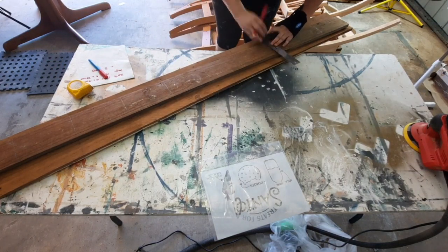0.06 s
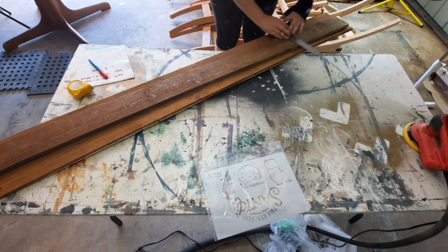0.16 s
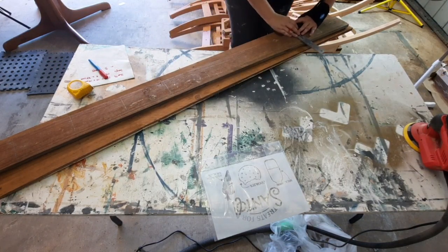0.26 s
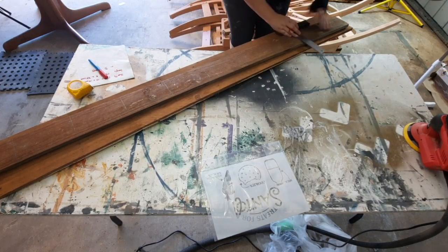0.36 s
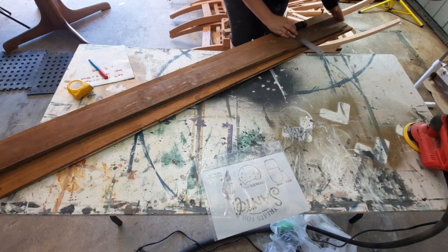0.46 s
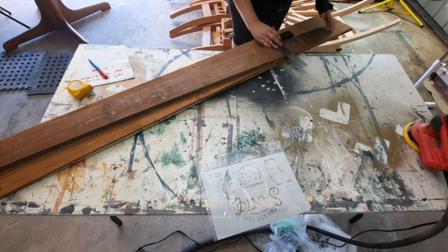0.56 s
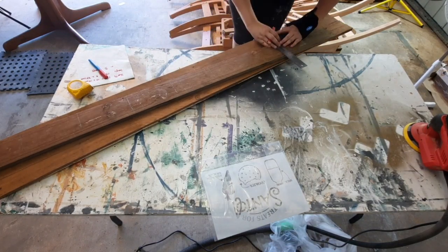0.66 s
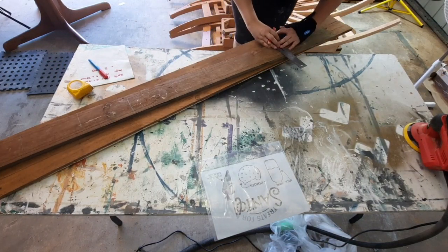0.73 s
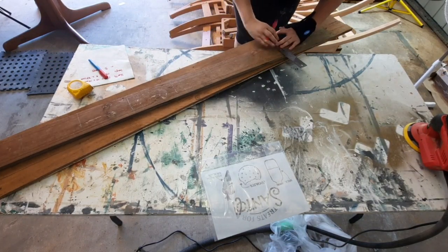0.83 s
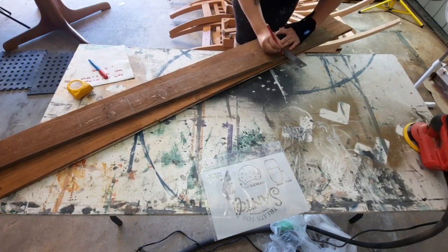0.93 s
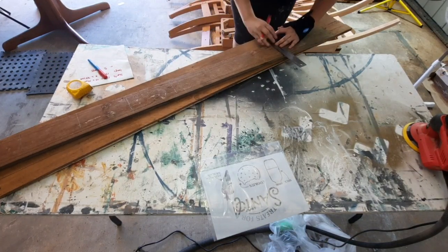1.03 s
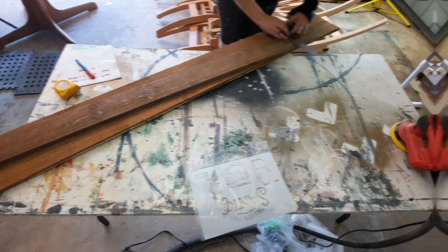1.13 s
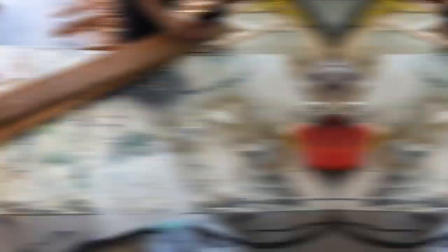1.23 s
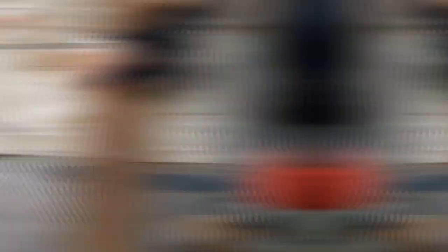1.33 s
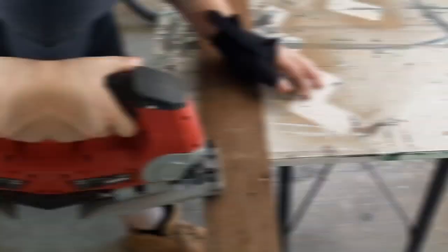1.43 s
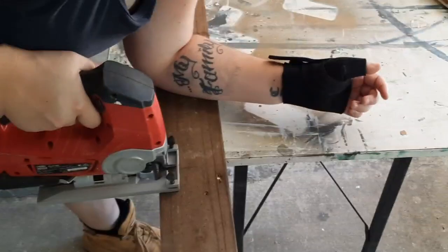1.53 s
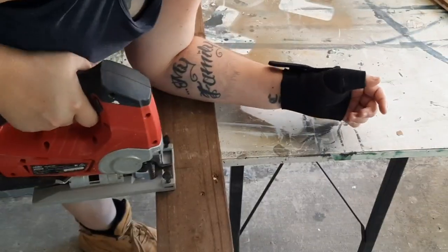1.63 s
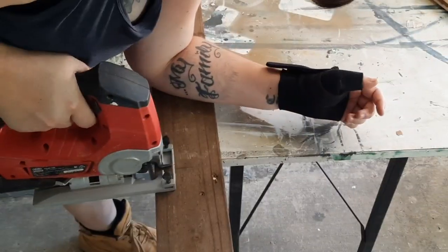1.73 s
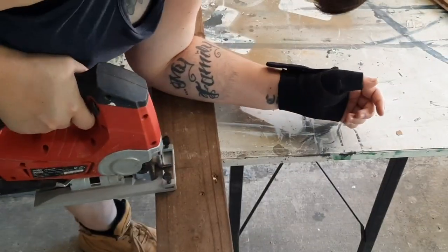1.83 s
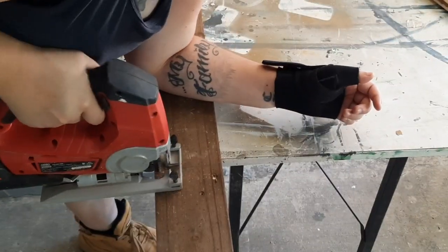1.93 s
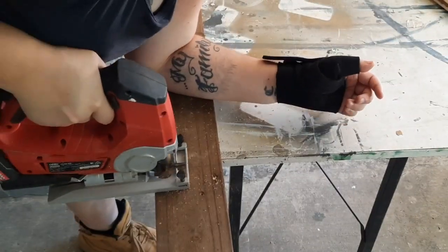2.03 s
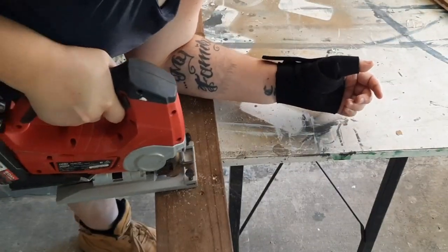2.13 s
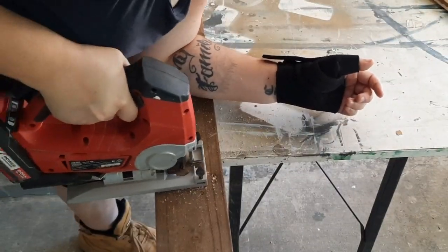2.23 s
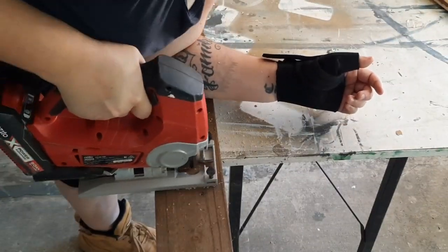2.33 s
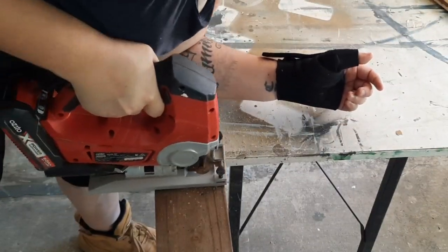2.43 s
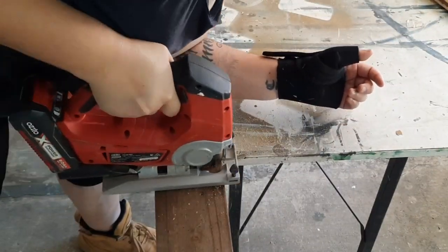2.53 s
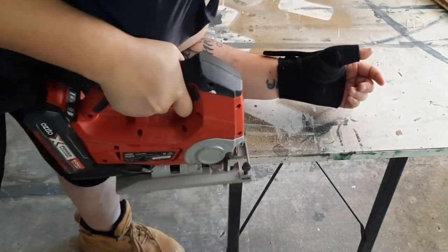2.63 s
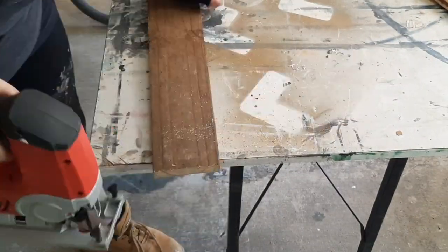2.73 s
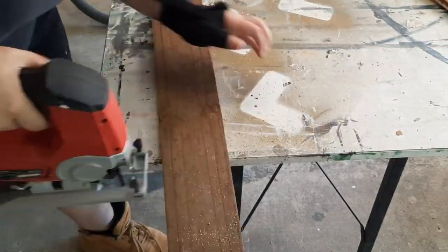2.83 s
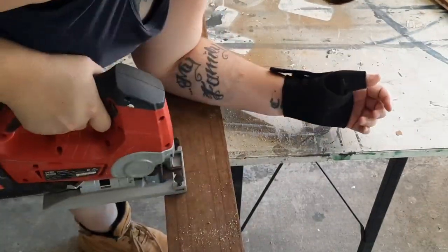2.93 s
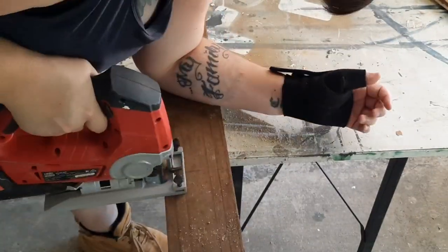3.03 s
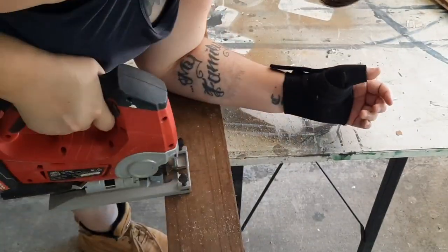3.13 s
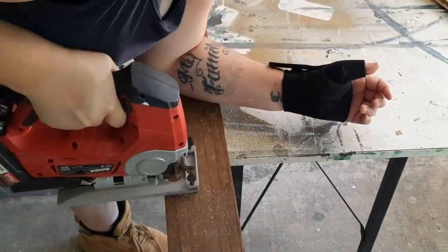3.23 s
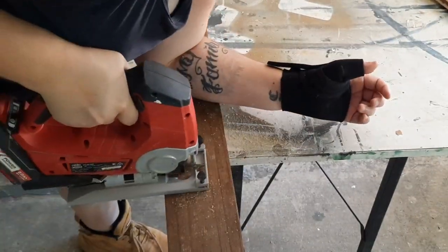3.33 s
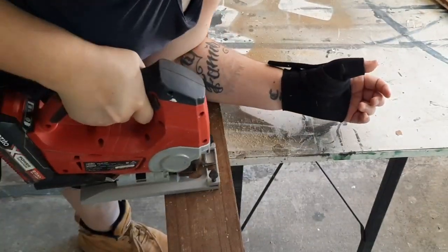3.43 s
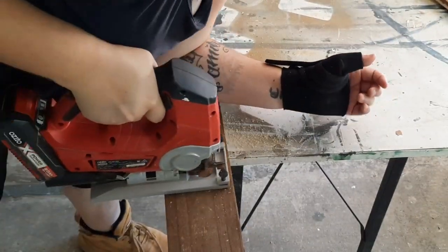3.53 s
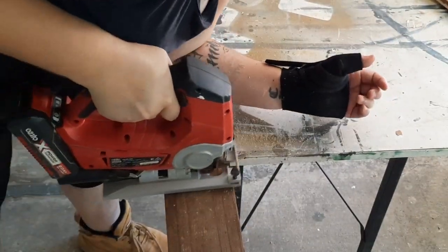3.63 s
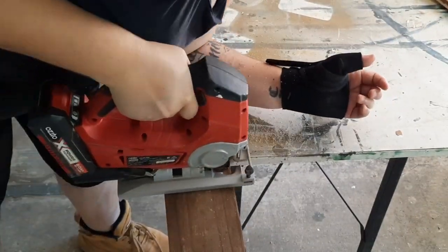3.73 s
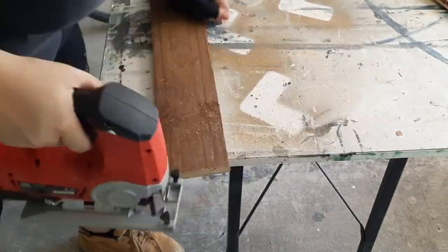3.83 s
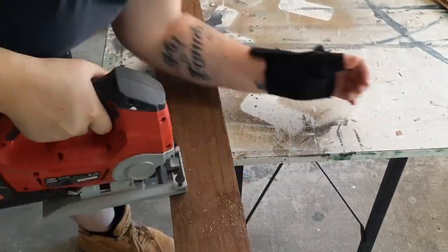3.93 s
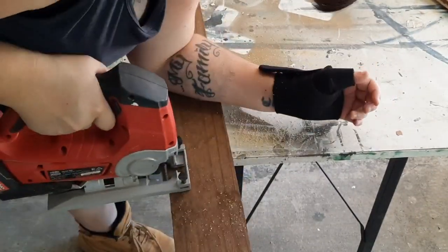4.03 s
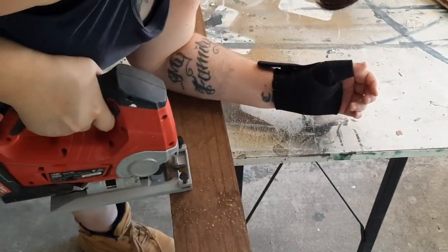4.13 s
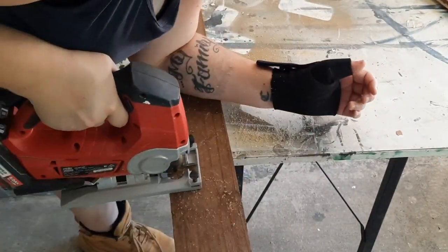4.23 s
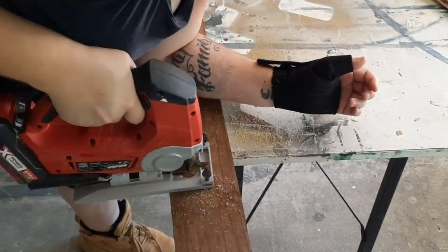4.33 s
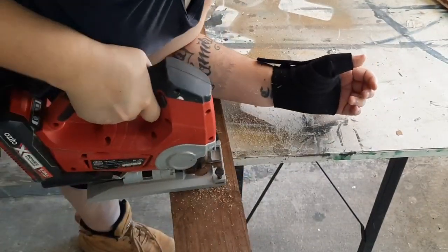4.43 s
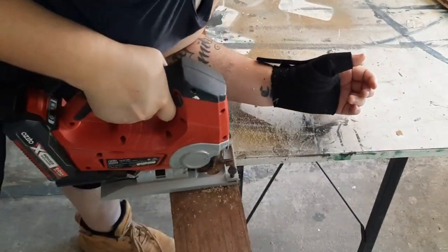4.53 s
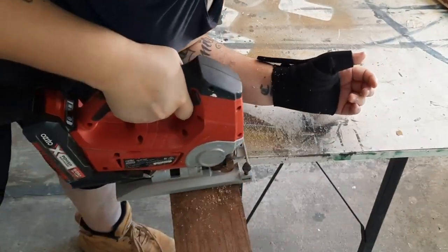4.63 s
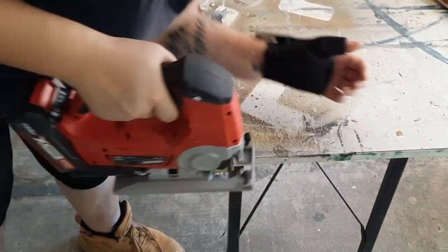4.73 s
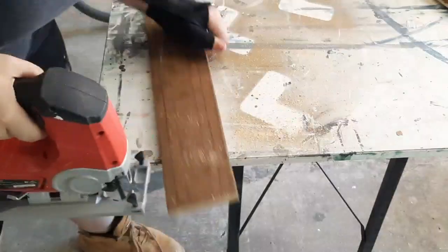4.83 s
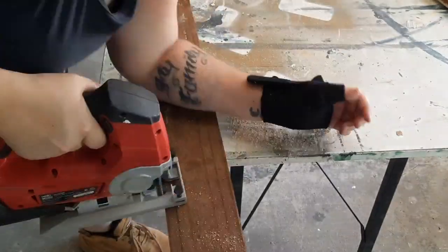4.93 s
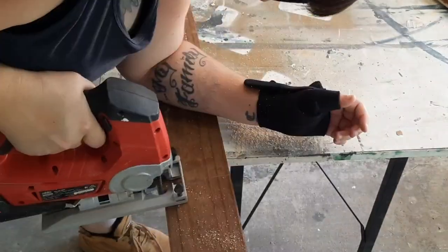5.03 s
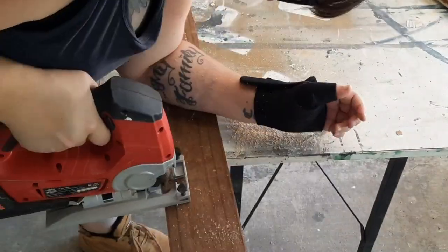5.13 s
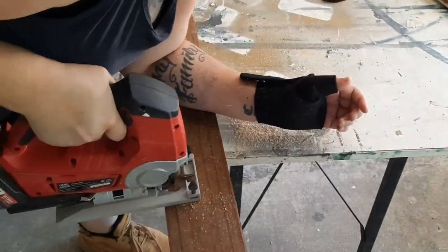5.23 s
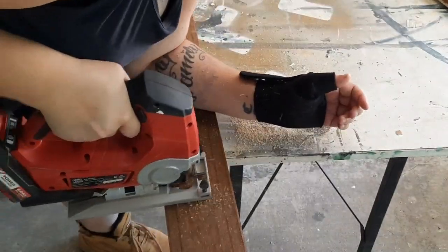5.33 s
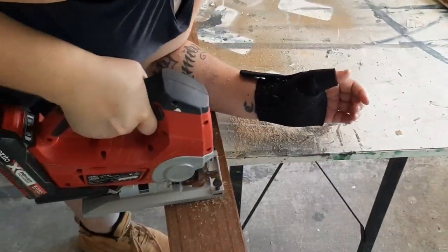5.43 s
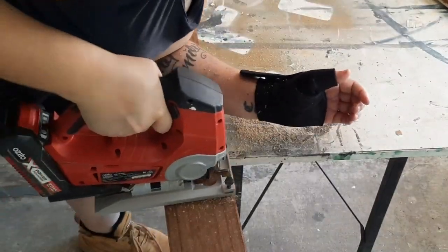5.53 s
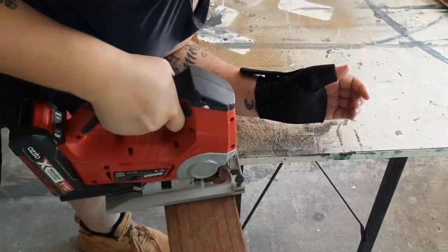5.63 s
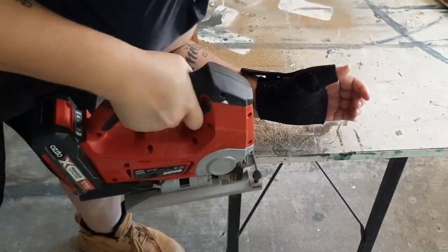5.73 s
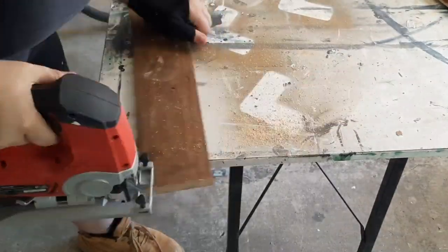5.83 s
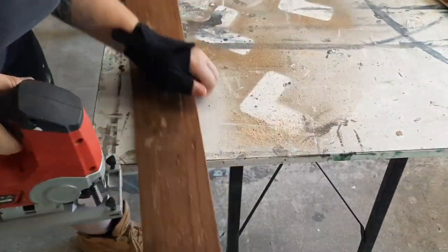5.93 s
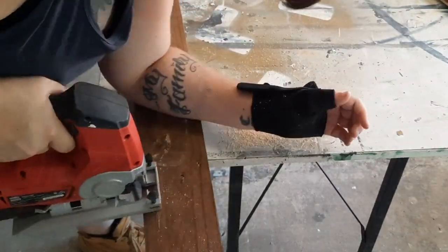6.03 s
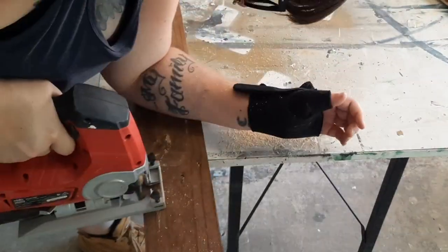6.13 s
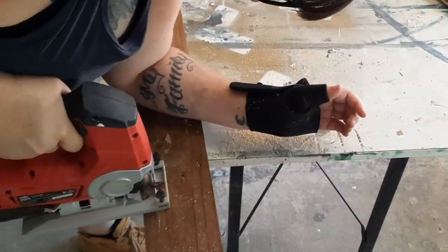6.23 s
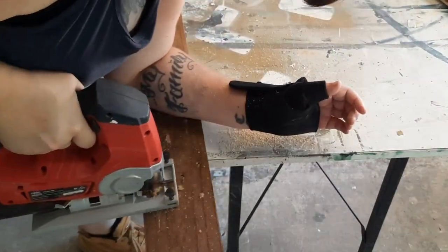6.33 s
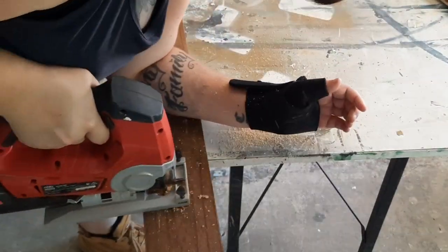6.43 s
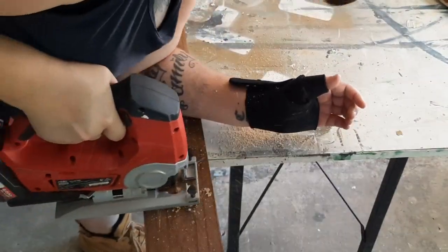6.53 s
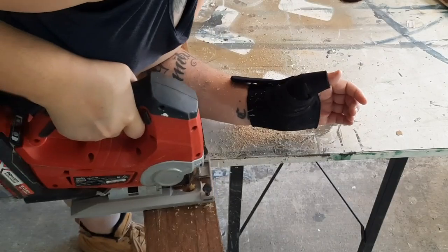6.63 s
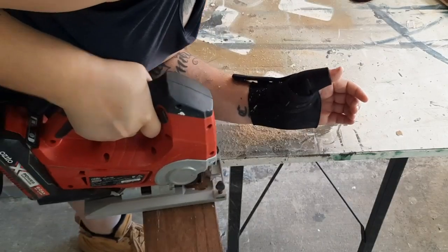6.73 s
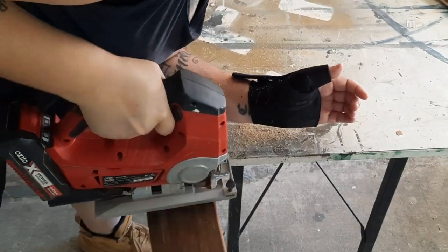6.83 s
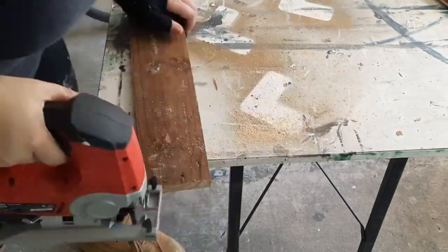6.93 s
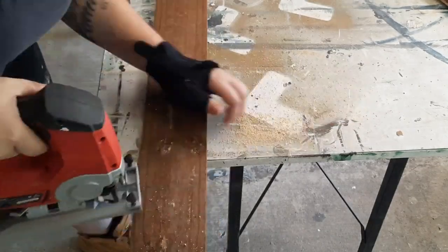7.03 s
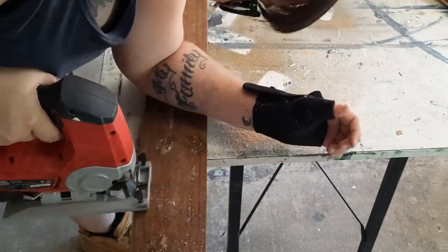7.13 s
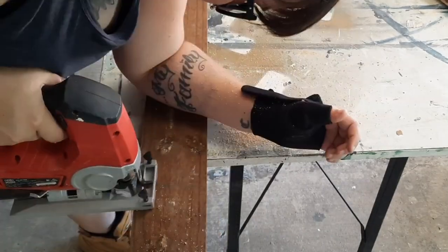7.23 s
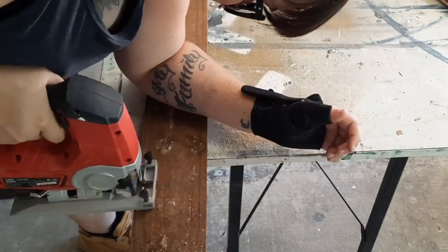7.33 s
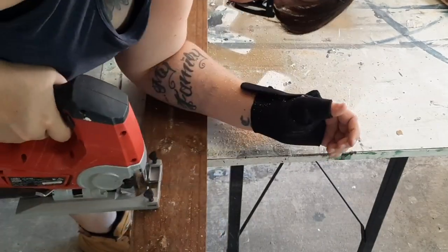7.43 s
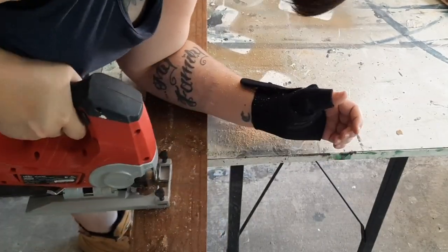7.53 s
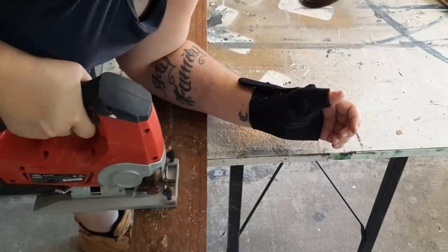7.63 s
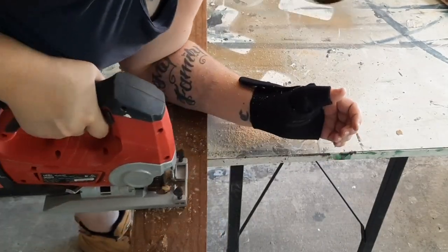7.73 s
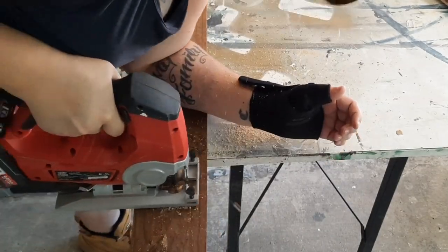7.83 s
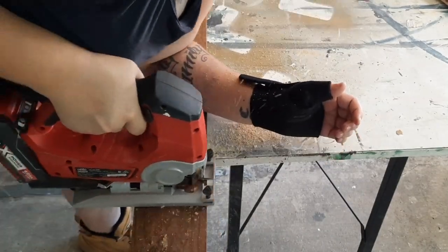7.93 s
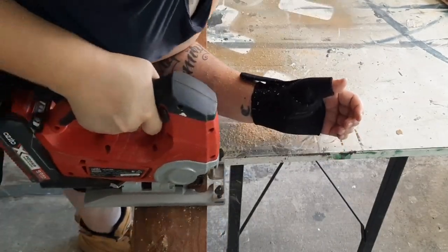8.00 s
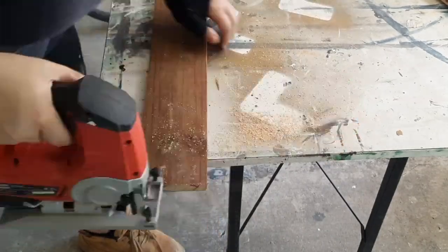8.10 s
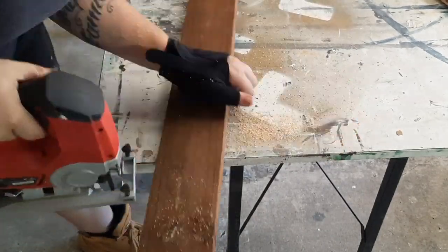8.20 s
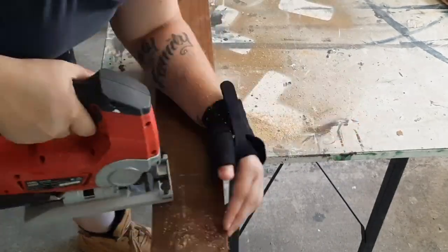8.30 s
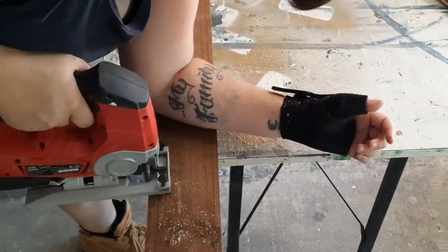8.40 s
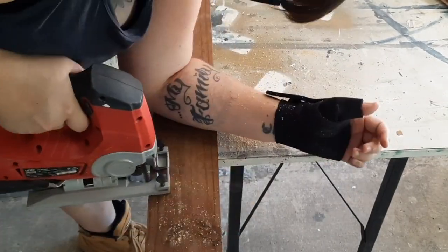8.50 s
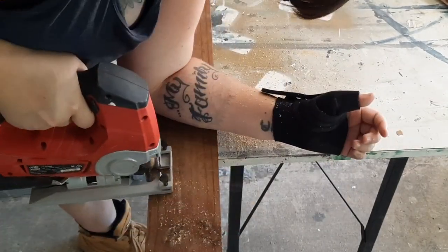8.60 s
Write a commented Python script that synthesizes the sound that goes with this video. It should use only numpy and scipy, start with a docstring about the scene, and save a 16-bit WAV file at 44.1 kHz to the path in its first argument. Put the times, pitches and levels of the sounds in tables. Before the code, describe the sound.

After a board scuffs on a workbench, a jigsaw saws timber in short stop-start bursts, with squeaks and a few clacks.

```python
"""A board is shuffled about on a workshop bench while far birds chirp; then a cordless jigsaw
crosscuts it in seven short spells. The teeth's impacts excite the resonances of saw, board and bench,
so each cut rasps and thrums under the drive's whine; where the hand leans on the saw, the sound grows
and the pitch sags. Friction makes the blade squeak as it binds and squeal as it leaves the kerf.
Between cuts the board is knocked along over a low hum."""
import sys
import numpy as np
from scipy import signal
from scipy.fft import rfft, irfft, next_fast_len
from scipy.io import wavfile
from scipy.ndimage import uniform_filter1d, map_coordinates

SR = 44100
rng = np.random.default_rng(int(sys.argv[2]) if len(sys.argv) > 2 else 0)


def digitize_waveform(pressure):
    """Quantize a signal to 16-bit integers and store it at the path in sys.argv[1].

    Rows of a 2-D input are taken as channels; values are limited to [-1, 1].
    """
    field = np.atleast_2d(pressure).T
    bounded = np.clip(field, -1, 1)
    quanta = np.round(bounded * 32767).astype(np.int16)
    wavfile.write(sys.argv[1], SR, quanta)


N = 381906

# Spells with the trigger held: (start [s], end [s], run-up time constant [s], hiss level [dB],
# chatter level [dB], thrum level [dB], hum level in the pause before [dB])
CUTS = [(1.807, 2.654, .22, -44, -45, -48, -57), (2.994, 3.778, 0.057, -44, -44.5, -47, -57.5),
        (4.082, 4.729, 0.088, -44, -45, -47, -60.5), (5.058, 5.744, 0.061, -44.5, -45.5, -45.5, -56),
        (6.107, 6.873, .15, -44.5, -45, -46.5, -58), (7.331, 8.064, 0.032, -43.5, -43.5, -49.5, -63.5),
        (8.522, 8.678, 0.14, -46, -46.5, -49, -57)]


def jigsaw():
    """Forced vibration: the teeth shake bench and board; load raises the level and slows the drive."""
    whine_hz, sag_hz_per_db, run_up_hz, flutter_hz = 1900, 21, 250, 43.3
    load_db, run_up, entry, breakthrough, (hiss_db, chatter_db, thrum_db) = effort()
    ease_db = 6.5 * breakthrough
    chatter_db = chatter_db + load_db - 0.72 * ease_db
    thrum_db = thrum_db + 0.061 * load_db - 6.5 * entry - ease_db
    drive_db = -40.5 + 0.18 * load_db - 3.5 * entry - ease_db
    hiss_db = hiss_db + 0.14 * load_db - 0.46 * ease_db
    pitch = whine_hz - sag_hz_per_db * load_db - run_up_hz * run_up
    trigger = sum(gate(start - .004, end - start + .012, rise=.012, fall=.008) for start, end, *_ in CUTS)
    # the hiss fades a little earlier, as the teeth break through
    biting = sum(gate(start - .008, end - start + .006, rise=.016, fall=.01) for start, end, *_ in CUTS)
    # the rasp flutters about 43 times a second
    flutter = 2 * np.pi * np.cumsum(flutter_hz + 0.15 * wobble(4.2)) / SR
    shake = amp(1.3 * np.cos(flutter) + 0.35 * np.cos(2 * flutter) + 0.25 * wobble(130))
    thrum = spread(bites(500, scatter_db=6, smear=0.75), body(65, 248))
    chatter = spread(bites(1200, scatter_db=0, smear=1), body(184, 1287))
    gears = spread(bites(1800, scatter_db=3, smear=0.61), body(1460, 2690))
    hiss = spread(bites(5000, scatter_db=4, smear=1.07), body(3340, 21000))
    rough_tones = [tone(pitch + 52 * wobble(150) + 40 * wobble(25)) * (1 + 0.4 * wobble(120))
                   for _ in range(2)]
    whine = spread(np.array(rough_tones), np.ones_like)
    drive = amp(-1.8) * gears + amp(-5.5 - 6 * entry) * whine
    cut = amp(chatter_db) * chatter + amp(thrum_db) * thrum + amp(drive_db) * drive
    cut = trigger * grain(cut, patchy_db=1.5)
    hiss = biting * amp(hiss_db + 0.44 * wobble(180)) * grain(hiss, patchy_db=2.1)
    return shake * (cut + hiss)


def effort():
    """Mechanical load: pushes add up; run-up and entry decay from 1, breakthrough grows to 1."""
    # The hand leans on the saw: (time of peak [s], half length [s], load [dB])
    pushes = [(1.893, .055, 6.5), (2.139, .035, 5.5), (2.451, .075, 6.5), (3.043, .09, 3.5),
              (3.317, .04, 4), (3.628, 0.06, 7.5), (4.114, .05, 3), (4.301, .1, 3.5), (4.577, .06, 5.5),
              (5.125, .065, 4.5), (5.319, .05, 6), (5.582, 0.075, 9.5), (6.238, .15, 2.5), (6.7, .075, 8),
              (7.463, .085, 6), (7.928, .014, 8.5), (8.65, .06, 6.5)]
    entry_s, breakthrough_s = 0.11, 0.047
    t = clock()
    load_db = sum(db * np.exp(-np.minimum(((t - s) / half) ** 2, 20)) for s, half, db in pushes)
    run_up, entry, breakthrough = np.zeros((3, N))
    levels = np.zeros((3, N))
    for start, end, run_up_s, *cut_db, _ in CUTS:
        now = t > start - .1
        age, remaining = np.maximum(t[now] - start, 0), np.maximum(end - t[now], 0)
        run_up[now] = np.exp(-age / run_up_s)
        entry[now] = np.exp(-age / entry_s)
        finishes = start < CUTS[-1][0]  # the last cut stops short of the far edge
        breakthrough[now] = np.exp(-remaining / breakthrough_s) * finishes
        levels[:, now] = np.array(cut_db)[:, None]
    return load_db, run_up, entry, breakthrough, levels


def bites(rate, scatter_db, smear):
    """Shot noise: fibres tear in uneven clicks, rate a second, over a bed of steady noise."""
    clicks = (rng.random(N) < rate / SR) * amp(scatter_db * rng.standard_normal(N))
    return unit(clicks * noise()) + smear * noise()


def body(lo_hz, hi_hz):
    """Resonance: the frequency response through which the bites are heard, within one band."""
    # Broad spectrum of the rasp: (frequency [Hz], spectral density [dB])
    rasp = [(35, -37.5), (60, -26.5), (129, -7), (242, -11.5), (305, 0), (343, -6.5), (403, -2),
            (559, -7.5), (673, -5), (1290, -3.5), (1790, 0), (3190, -10), (7540, -20.5), (9300, -21.5),
            (15500, -25)]
    # Resonances and dips of saw, board and bench: (frequency [Hz], width [Hz], gain [dB])
    resonances = [(135, 11, 4.5), (244, 67, -10), (316, 39, 4.5), (399.5, 35, 5), (510, 30, 6.5),
                  (610, 39, 0.5), (688, 53, 6), (810, 14, -2), (972, 35, 4.5), (1458, 79, 5), (1976, 32, 4),
                  (2640, 900, 6), (7630, 2900, 2.5), (9570, 1670, -4), (12150, 1500, 2.5),
                  (15000, 900, -0.5)]
    # Resonances of the gear housing: (frequency [Hz], width [Hz], gain [dB])
    housing = [(1622, 40, 4), (1775, 55, 3.5)]

    def response(hz):
        peaks_db = sum(db / (1 + (2 * (hz - centre) / width) ** 2)
                       for centre, width, db in resonances + housing)
        return amp(along(rasp, hz) + peaks_db) * band(hz, lo_hz, hi_hz)
    return response


def grain(x, patchy_db):
    """Spectral modulation: uneven wood makes narrow bands swell and sink for tens of milliseconds."""
    spectra = signal.stft(x, nperseg=1024)[2]
    patches = rng.standard_normal(spectra.shape[1:])
    for axis in (0, 1):
        patches = uniform_filter1d(patches, size=3, axis=axis)
    return signal.istft(spectra * amp(patchy_db * unit(patches)), nperseg=1024)[1][:, :N]


def squeals():
    """Friction excites the blade: it squeaks where it binds, and scrapes and sings leaving the kerf."""
    # Modes of blade and shoe: (frequency [Hz], width [Hz], level [dB])
    modes = [(1200, 160, -4), (1470, 200, 0), (2020, 200, -7), (2480, 220, 0), (3420, 250, -5),
             (5100, 500, -16), (6000, 500, -17), (6900, 600, -19)]
    # The blade binds: (time [s], frequency [Hz], level [dB])
    squeaks = [(1.87, 622, -42), (1.935, 1466, -40), (4.076, 837, -46), (5.075, 972, -37.5),
               (5.176, 1480, -41), (6.643, 1137, -43)]
    # The blade leaves the kerf: (time [s], length [s], level [dB], singing frequency [Hz])
    scrapes = [(2.635, 0.036, -38, 2473), (2.685, 0.037, -50, 2540), (2.716, .024, -51.5, 1440),
               (3.782, 0.027, -40, 3350), (3.824, 0.026, -50, 1222), (4.734, 0.028, -42, 2360),
               (4.76, 0.043, -47, 2340), (5.75, 0.038, -47, 2500), (6.874, .017, -43.5, 1526),
               (6.89, 0.028, -44, 2420), (8.06, 0.025, -40.5, 1380)]

    def steel(hz):
        return sum((-1) ** k * amp(db) * 1j * hz * width / (centre ** 2 - hz ** 2 + 1j * hz * width)
                   for k, (centre, width, db) in enumerate(modes))
    waver = 1 + 0.01005 * wobble(200)
    touch = lambda start, length: gate(start, length, rise=0.006, fall=0.0063)
    song = sum(amp(db) * touch(start, length=0.026) * tone(hz * waver) for start, hz, db in squeaks)
    rub = np.zeros(N)
    for start, length, db, hz in scrapes:
        contact = amp(db) * touch(start, length)
        rub += contact
        song += amp(0.5) * contact * tone(hz * waver)
    ring = unit(sum(amp(db + 6 * wobble(70)) * tone(hz * (1 + .008 * wobble(200))) for hz, _, db in modes))
    scrape = spread(bites(2000, scatter_db=5.5, smear=0.88), steel)
    kerf = spread(bites(1200, scatter_db=5, smear=0.32), body(250, 1640))  # the wood's own dull rasp
    return rub * (amp(-3.3) * scrape + amp(-4.5) * ring + amp(-11) * kerf) + song * amp(3.3 * wobble(220))


def clacks():
    """Free vibration: a hard contact gives a dull crack and leaves the wood's damped modes ringing."""
    # Hard contacts on the wood, among them the cut-off piece clacking down near 8.1 s: (time [s], level [dB])
    impacts = [(3.604, -21.5), (5.777, -32), (6.693, -28), (6.72, -17.5), (7.928, -24), (8.067, -20.5),
               (8.078, -21.5), (8.112, -18.5), (8.117, -21.5)]
    # Modes of the wood: (frequency [Hz], level [dB], time to decay by 60 dB [s])
    modes = [(626, -36, 0.097), (786, -20.5, 0.038), (1190, -2.5, 0.02), (1650, 0.5, 0.014),
             (2440, -2, 0.018), (2650, -11, 0.039), (3400, -8, 0.018)]
    out, t = np.zeros((2, N + SR)), np.arange(SR // 5) / SR
    attack = 1 - np.exp(-t / 0.00017)
    for start, db in impacts:
        ring = sum(amp(level + rng.normal(0, 1.9, (2, 1)) - 60 * t / t60)
                   * np.sin(2 * np.pi * hz * t + rng.uniform(0, 2 * np.pi)) for hz, level, t60 in modes)
        crack = 0.38 * amp(-60 * t / 0.0081) * rng.standard_normal((2, len(t)))
        first = round(start * SR)
        out[:, first:first + len(t)] += amp(db - 4) * (ring + crack) * attack
    return filtered(out[:, :N], lambda hz: 1 / (1 + (hz / 4200) ** 3))


def board():
    """Friction and impact: the board scuffs as it slides; set down, it rings and thumps the bench."""
    # The board slides: (time [s], length [s], level [dB])
    slides = [(-0.002, 0.05, -43.5), (0.085, 0.035, -50.5), (0.133, 0.057, -47), (.458, .092, -42),
              (0.96, 0.053, -47), (1.114, 0.069, -52.5), (5.909, 0.06, -63), (7.004, 0.043, -61.5),
              (8.209, 0.054, -66)]
    # The board is set down; its ring depends on where it is held:
    # (time [s], length [s], knock level [dB], thump level [dB], ring frequency [Hz])
    knocks = [(0.015, 0.023, -37, -52, 867), (0.085, 0.032, -42.5, -64, 1660), (.481, 0.024, -37, -32, 370),
              (0.501, 0.06, -46, -41.5, 330), (1.11, 0.027, -46, -57, 1040), (2.826, .024, -58, -53, 330),
              (3.895, 0.027, -61.5, -62, 300), (4.873, 0.022, -43.5, -51, 470),
              (5.818, 0.045, -53.5, -67, 525), (5.962, 0.017, -44.5, -42, 300),
              (7.003, 0.037, -45, -50, 420), (8.231, 0.038, -57.5, -61, 712)]
    # Spectra of knocked board, scuffed face and thumped bench: (frequency [Hz], spectral density [dB])
    knock_spectrum = [(120, -9), (200, 6.5), (252, -2), (377, 6), (491, -0.5), (878, 1), (1160, -9.5),
                      (1660, -2.5), (2500, -16), (3250, -51.5), (5500, -120)]
    scuff_spectrum = [(710, -21), (1200, -7.5), (1970, -8.5), (2170, -5.5), (4090, -14), (6040, -18.5),
                      (9320, -28.5), (15000, -32)]
    thump_spectrum = [(50, -35), (90, -19), (125, 12.5), (170, -4), (300, -32.5), (600, -47), (1500, -100)]
    touch = lambda start, length: gate(start, length, rise=0.01, fall=0.0089)
    scuff = sum(amp(db) * touch(start, length) for start, length, db in slides)
    thump, knock, ring = np.zeros((3, N))
    waver_hz = 30 * wobble(170)
    for start, length, knock_db, thump_db, ring_hz in knocks:
        contact = touch(start, length)
        knock += amp(knock_db) * contact
        thump += amp(thump_db) * contact
        ring += amp(knock_db - 2.5) * contact * tone(ring_hz + waver_hz)
    judder = spread(bites(1500, scatter_db=5.5, smear=0.65), lambda hz: amp(along(knock_spectrum, hz)))
    judder *= np.hypot(knock, amp(-2) * scuff)  # a sliding board knocks too
    bump = amp(-40) * gate(start=.828, length=0.014, rise=0.0049, fall=0.0065) * tone(np.full(N, 62))
    impacts = thump * rush(thump_spectrum) + judder + ring * amp(wobble(110)) + bump
    return impacts + scuff * rush(scuff_spectrum)


def birds():
    """Frequency modulation: hoarse glides with a weaker partial an octave below, blurred by echoes."""
    # Far chirps: (time [s], length [s], start frequency [Hz], end frequency [Hz], level [dB])
    chirps = [(0.197, 0.028, 5800, 5490, -49.5), (0.299, 0.045, 4400, 5430, -56),
              (0.541, 0.032, 5800, 5700, -54), (.78, 0.026, 5670, 5850, -55.5),
              (0.899, 0.019, 5730, 5900, -49.5), (1.011, 0.026, 5460, 5260, -52.5),
              (1.252, 0.014, 4900, 5300, -59)]
    out, waver = np.zeros(N), 1 + .04 * wobble(700)
    for start, length, from_hz, to_hz, db in chirps:
        pitch = np.interp(clock(), [start, start + length], [from_hz, to_hz]) * waver
        voice = tone(pitch) + amp(-3) * tone(pitch / 2)
        out += amp(db) * gate(start, length, rise=0.0094, fall=0.0056) * voice
    return amp(-9.5) * out + amp(-6.5) * walls(out[None])


def workshop():
    """Superposition: rumble and outdoor air fade; room noise, motor hum and ticks rise in each pause."""
    # Spectra of rumble, outdoor air and room noise: (frequency [Hz], spectral density [dB])
    rumble = [(13, -47), (22, -11), (53, -8), (70, 2.5), (113, -4.5), (173, -14), (200, -8.5), (260, -43),
              (440, -120)]
    air = [(76, -28), (130, -4), (294, -1.5), (365, -2), (428, -8), (793, -7.5), (2880, -18), (3450, -24),
           (5900, -24.5), (9500, -32), (15000, -38)]
    room = [(15, -58), (25, -15), (86, -10.5), (118, -18.5), (158, -6), (213, -17.5), (301, -8), (501, -17),
            (588, -15.5), (637, -17.5), (3830, -33.5), (11200, -44.5), (15000, -51)]
    # Partials of the motor's hum: (frequency [Hz], relative level [dB])
    partials = [(145.3, -63.5), (296.1, -67.5), (457.6, -86), (581.4, -87), (726.7, -91.5)]
    quiet_s, fade_s = 1.359, 0.4
    hum_swell_db, room_swell_db = 21, 13.5
    fade = np.clip((quiet_s - clock()) / fade_s, 0, 1)
    gust_db = .8 * wobble(8)
    opening = fade * (amp(-51 + gust_db) * rush(rumble) + amp(-51.5 + gust_db / 2) * rush(air))
    resting, hum_level, room_level = np.zeros((3, N))
    pause_starts = [quiet_s] + [cut[1] for cut in CUTS]
    for start, (end, *_, hum_db) in zip(pause_starts, CUTS):
        progress = np.clip((clock() - start) / (end - start), 0, 1)
        dip = (1 - progress) ** 1.95
        pause = gate(start, end - start + 0.021, rise=0.07, fall=0.012)
        resting += pause
        hum_level += amp(hum_db - hum_swell_db * dip) * pause
        room_level += amp(-61.5 - room_swell_db * dip) * pause
    drift = 1 + .006 * wobble(14)
    hum = unit(sum(amp(db) * tone(hz * drift) for hz, db in partials)) * amp(0.42 * wobble(40))
    ticks = unit(amp(3.8 * wobble(50)) * spread(noise(), lambda hz: band(hz, 5300, 17000)))
    sawdust = amp(-83.5) * resting * ticks  # crackles under the shoe
    return opening + hum_level * hum + room_level * rush(room) + sawdust + amp(-89.5) * rush(air)


def walls(x):
    """Reverberation: convolution with a noise tail that dies sooner in the treble."""
    # Decay of the room: (frequency [Hz], reverberation time [s])
    decay = [(200, 0.22), (1700, 0.24), (2600, 0.18), (10000, 0.059)]
    hz, t, spectra = signal.stft(rng.standard_normal((2, SR // 2)), SR, nperseg=256)
    tail = signal.istft(spectra * amp(-60 * t / along(decay, hz)[:, None]), SR, nperseg=256)[1]
    return signal.fftconvolve(x, tail / np.linalg.norm(tail[0]), axes=1)[:, :N]


def spread(pair, colour):
    """Partial coherence: two unrelated signals become coloured stereo, alike in the bass; mid rms 1."""
    # Likeness of left and right: (frequency [Hz], correlation [1])
    coherence = [(30, 0.65), (80, 1), (150, 1), (400, 0.86), (1000, 0.36), (2000, 0.28), (5000, 0.25),
                 (12000, 0.067)]

    def mid_side(hz):
        angle = np.arccos(np.clip(along(coherence, hz), -1, 1)) / 2
        return colour(hz) * np.array([np.cos(angle), np.sin(angle)])
    mid, side = filtered(pair, mid_side)
    return np.array([mid + side, mid - side]) / np.std(mid)


def rush(spectrum):
    """Spectral shaping of stereo noise."""
    return spread(noise(), lambda hz: amp(along(spectrum, hz)))


def noise():
    """Two uncorrelated white noises."""
    return rng.standard_normal((2, N))


def tone(hz):
    """A sine of rms 1 whose phase is the integral of frequency."""
    return np.sqrt(2) * np.sin(2 * np.pi * np.cumsum(hz) / SR)


def gate(start, length, rise, fall):
    """An envelope of linear attack, hold and exponential decay; times in seconds."""
    t = clock() - start
    live = (t > 0) & (t < length + 10 * fall)
    out = np.zeros(N)
    out[live] = np.minimum(t[live] / rise, 1) * np.exp(-np.maximum(t[live] - length + fall, 0) / fall)
    return out


def wobble(rate):
    """Smooth random modulation: a spline through rate knots a second."""
    return map_coordinates(rng.standard_normal(int(N * rate / SR) + 4), [np.arange(N) * rate / SR])


def filtered(x, response):
    """Linear filtering: the spectrum of x times a frequency response."""
    size = next_fast_len(N + SR // 4)
    return irfft(rfft(x, size) * response(np.fft.rfftfreq(size, 1 / SR)), size)[..., :N]


def band(hz, lo_hz, hi_hz):
    """Gain of a band-pass with sixth-order slopes."""
    return ((1 + (lo_hz / (hz + 1)) ** 12) * (1 + (hz / hi_hz) ** 12)) ** -.5


def along(points, hz):
    """Interpolation of (frequency [Hz], value) points on a logarithmic frequency axis."""
    frequencies, values = np.transpose(points)
    return np.interp(np.log(hz + 1), np.log(frequencies + 1), values)


def amp(db):
    """Decibels to amplitude ratio."""
    return 10 ** (np.asarray(db) / 20)


def unit(x):
    """Normalisation to rms 1."""
    return x / np.sqrt(np.mean(x ** 2) + 1e-20)


def clock():
    """The time of each sample in seconds."""
    return np.arange(N) / SR


def scene():
    """Time and level differences place the work close by on the left, ahead of the room's sound."""
    # Level difference of the work: (frequency [Hz], left minus right [dB])
    balance = [(60, -3.5), (110, 2), (200, 0.5), (380, 2.5), (700, 3.5), (1290, 3.5), (2380, 3.5),
               (4400, 1.5), (8120, 1.5), (15000, 8)]
    sides, lag_s = np.array([[1], [-1]]), 0.00012
    placement = lambda hz: amp(sides * along(balance, hz) / 2) * np.exp(1j * np.pi * hz * lag_s * sides)
    work = filtered(jigsaw() + squeals() + clacks() + board(), placement)
    return work + amp(-23) * walls(work) + (workshop() + birds()) * amp(sides * 1.28)


def record(dry):
    """Band limiting: a steep low-pass removes the highest treble."""
    top_hz, slope_width_hz = 15800, 300
    return filtered(dry, lambda hz: np.clip((top_hz - hz) / slope_width_hz + .5, 0, 1))


dry = scene()
out = record(dry)
digitize_waveform(out)
```